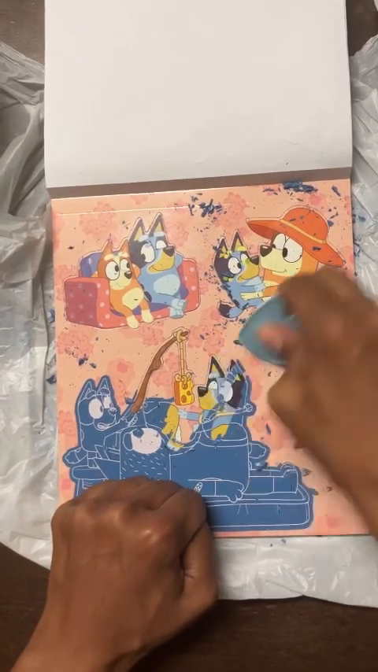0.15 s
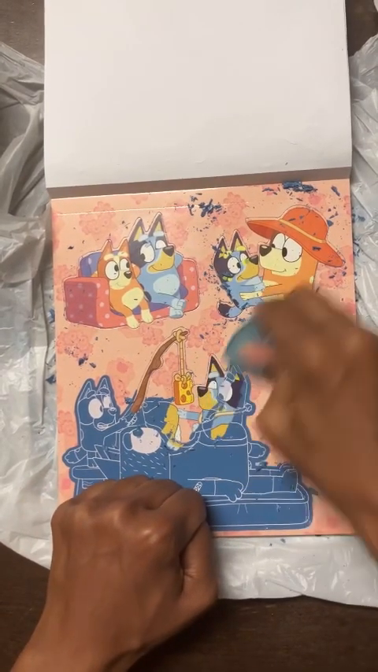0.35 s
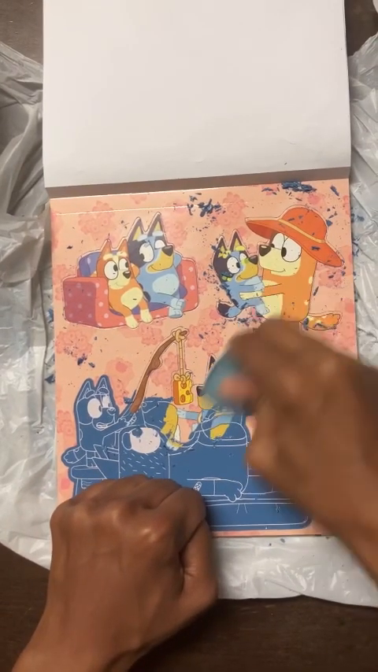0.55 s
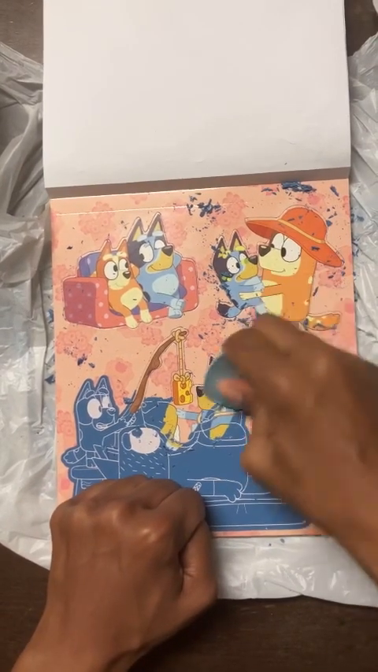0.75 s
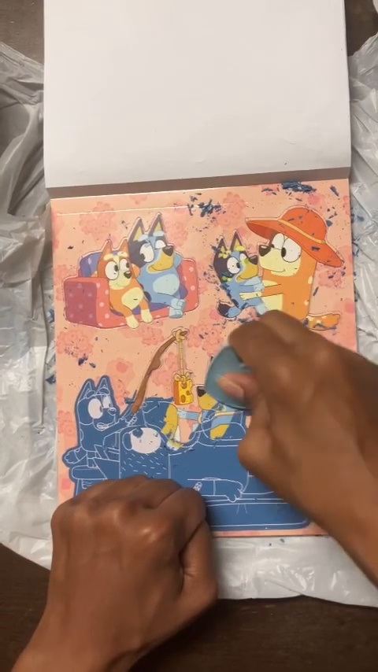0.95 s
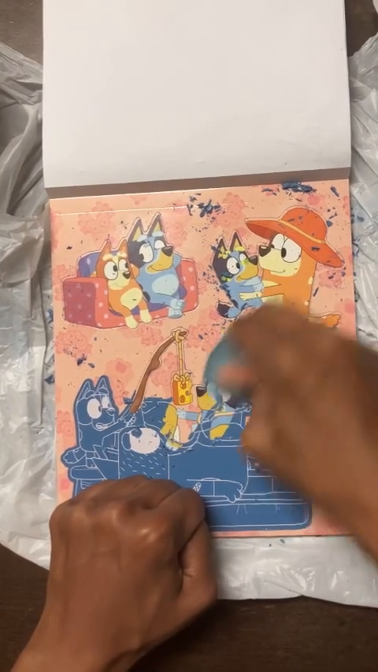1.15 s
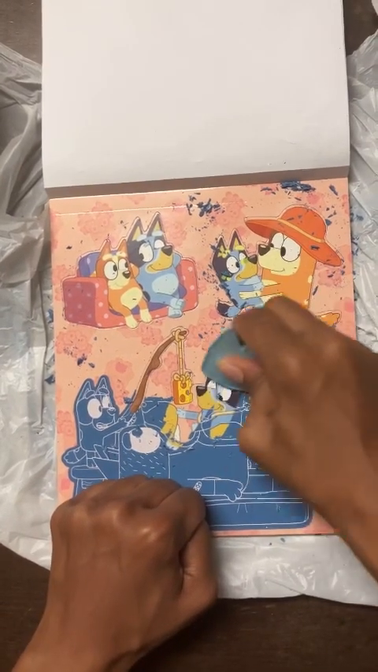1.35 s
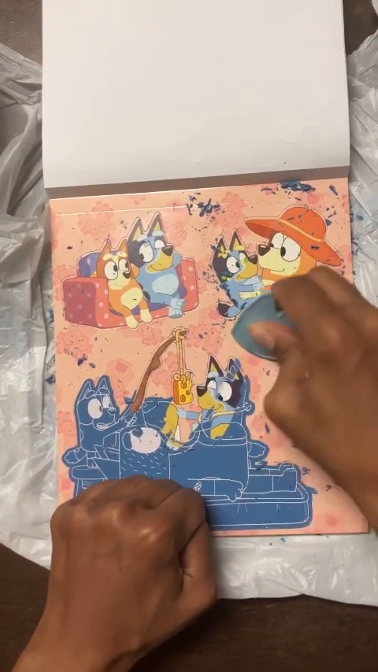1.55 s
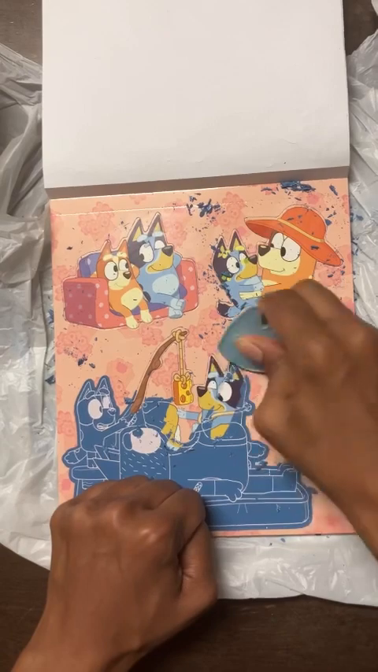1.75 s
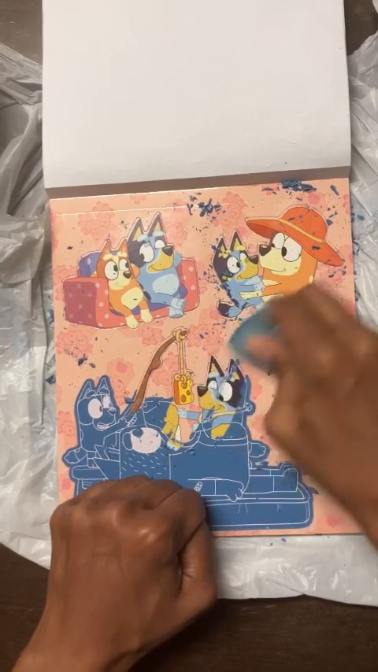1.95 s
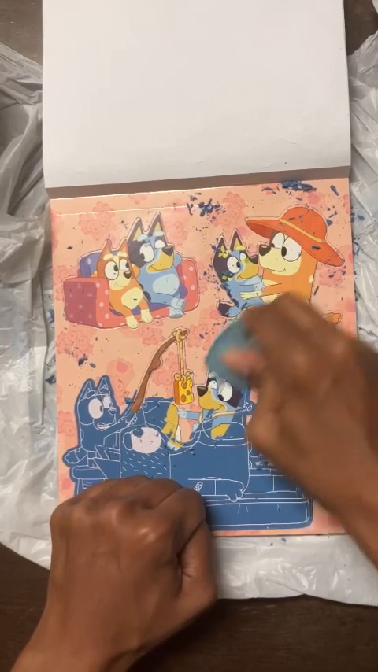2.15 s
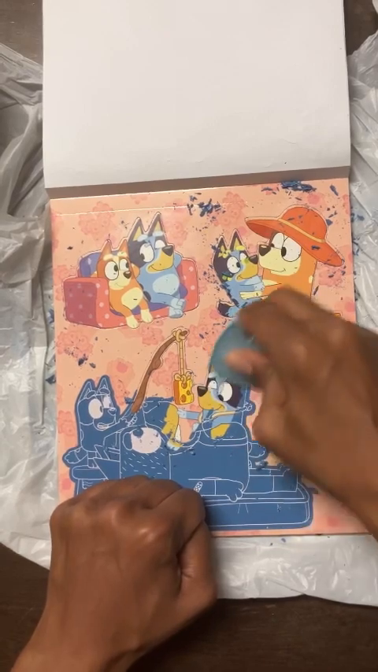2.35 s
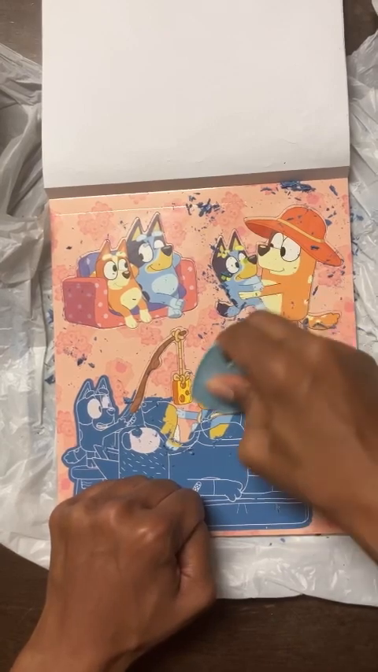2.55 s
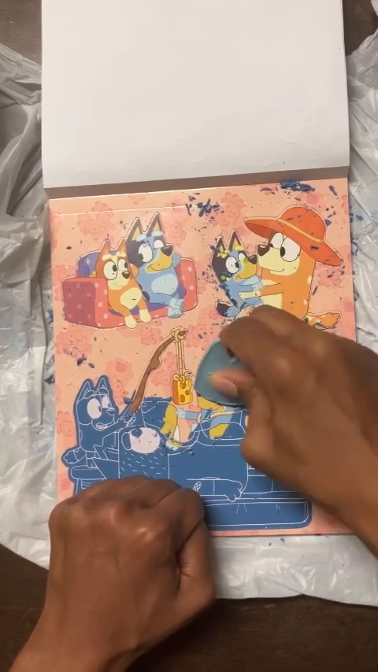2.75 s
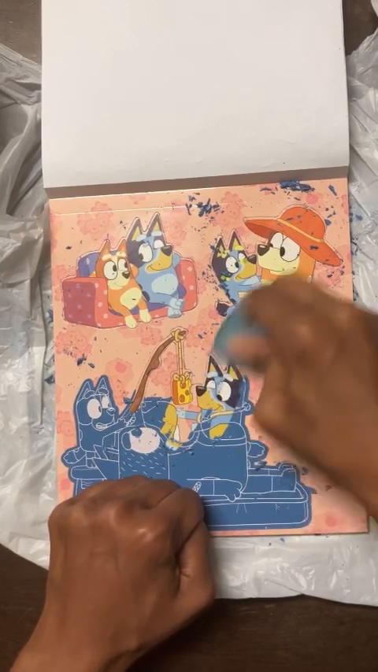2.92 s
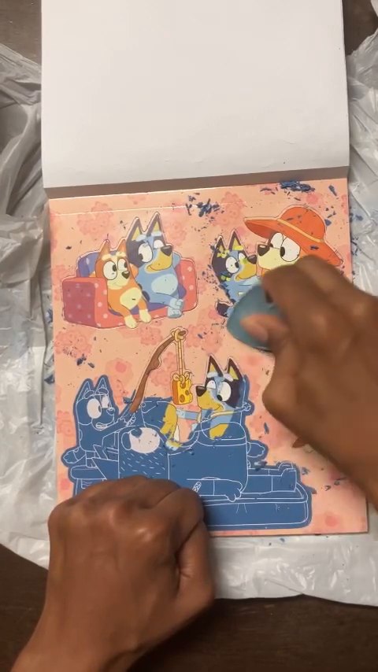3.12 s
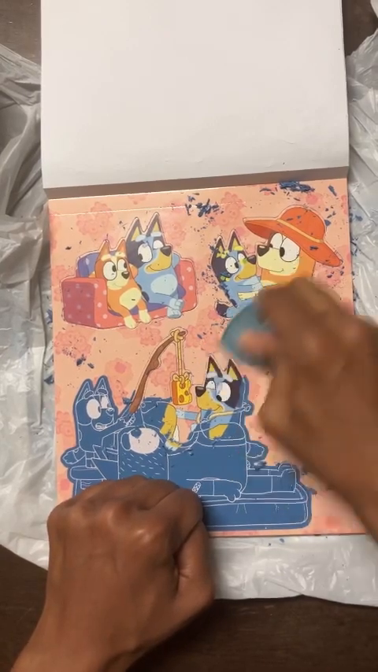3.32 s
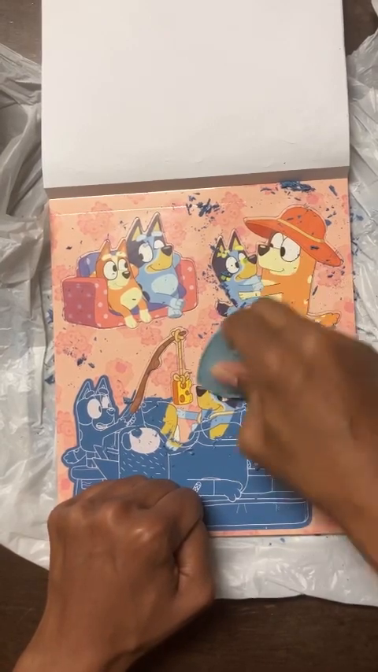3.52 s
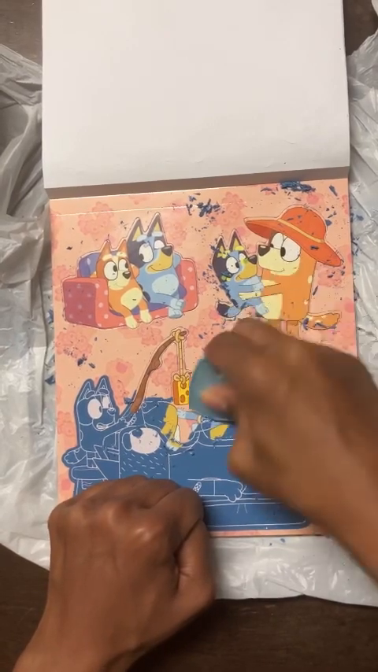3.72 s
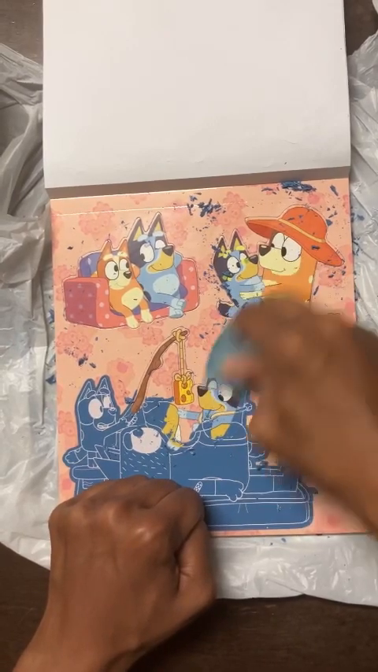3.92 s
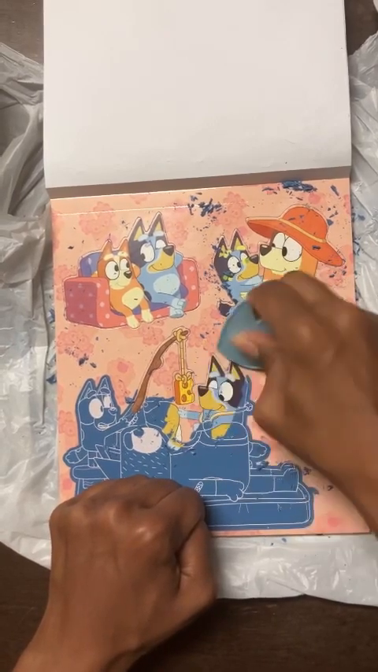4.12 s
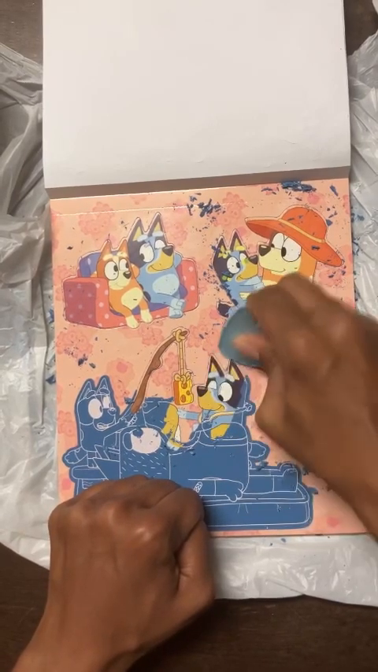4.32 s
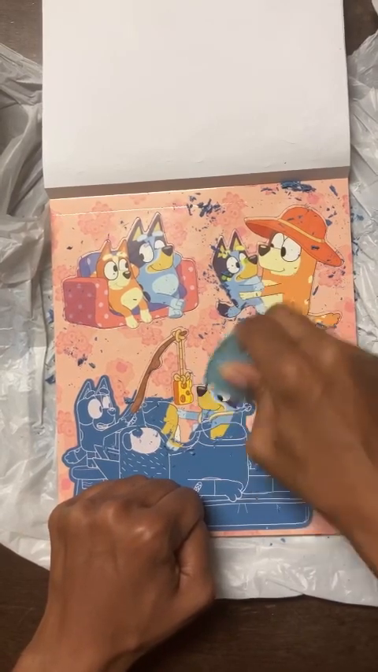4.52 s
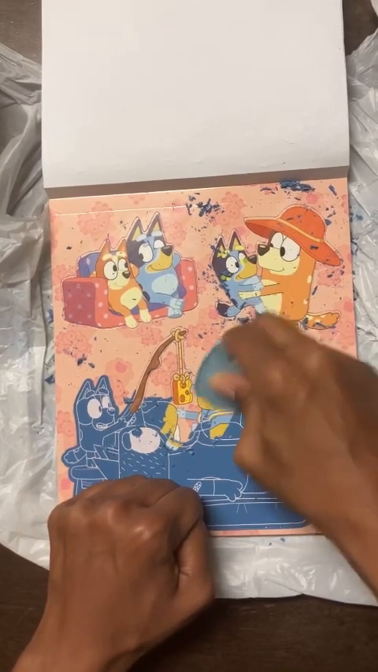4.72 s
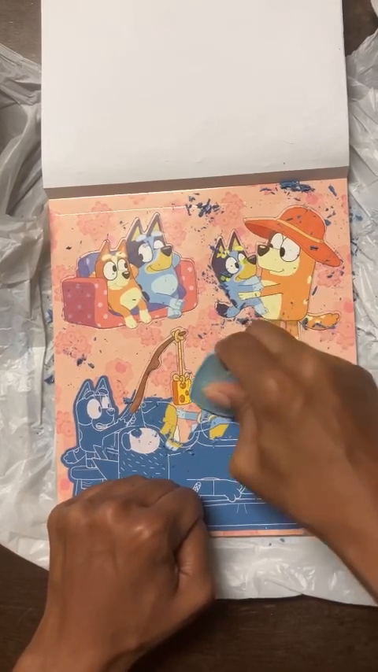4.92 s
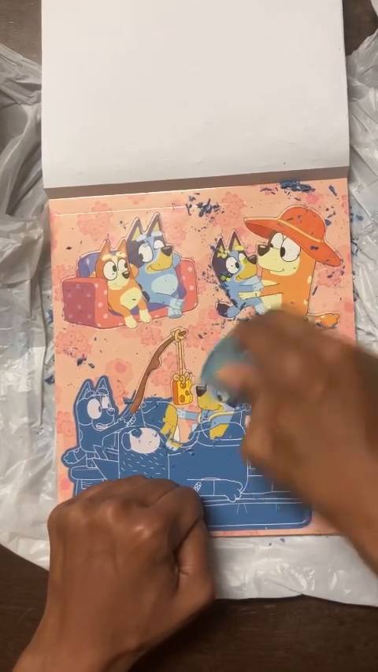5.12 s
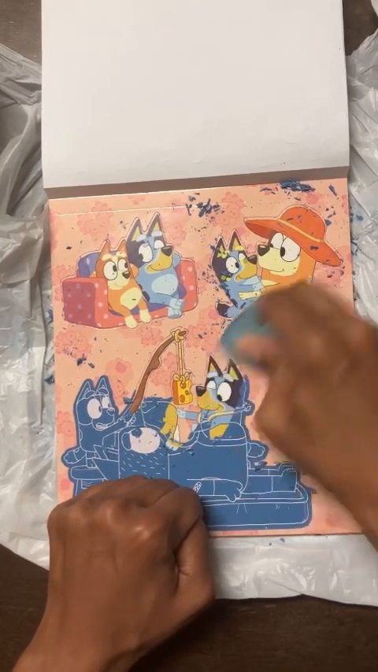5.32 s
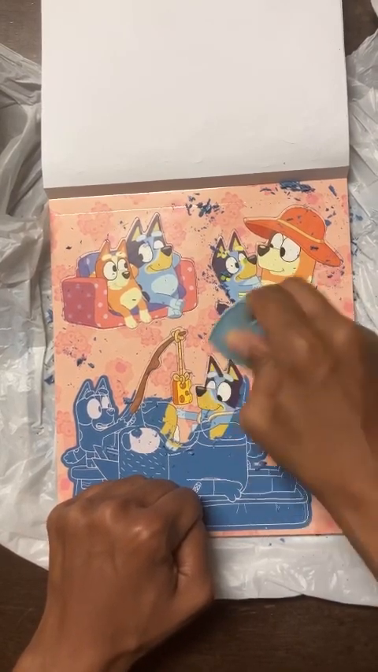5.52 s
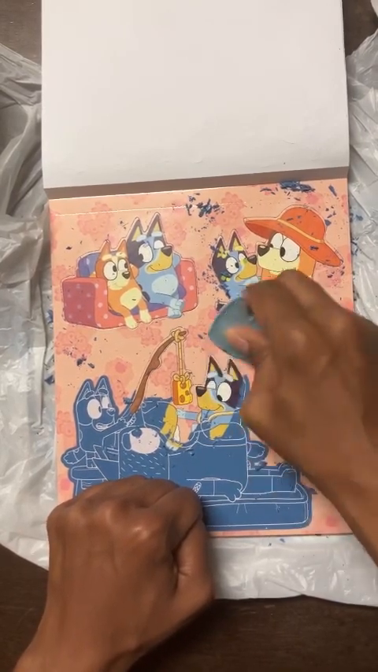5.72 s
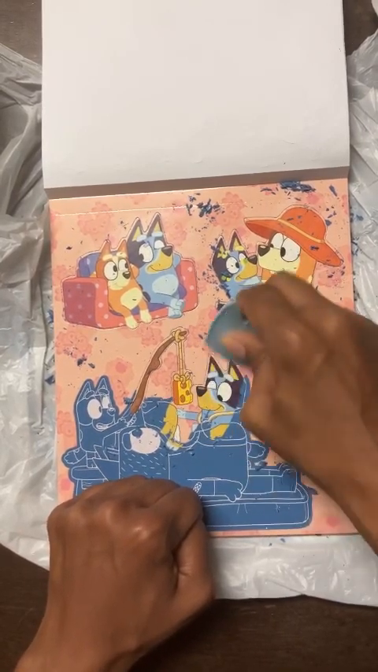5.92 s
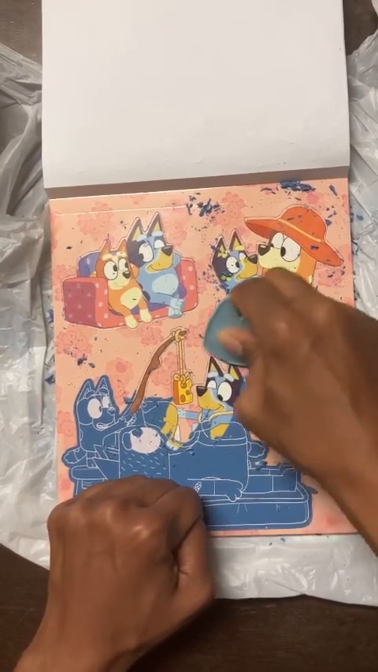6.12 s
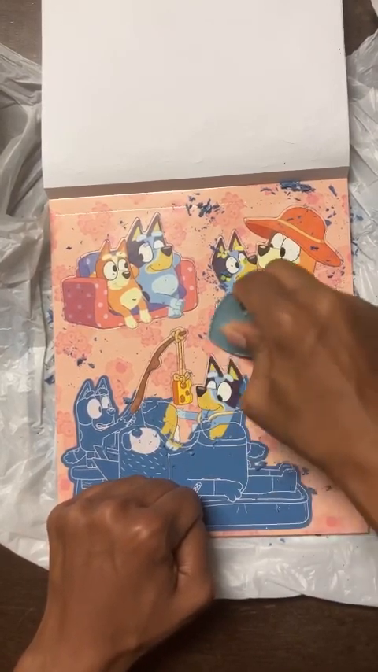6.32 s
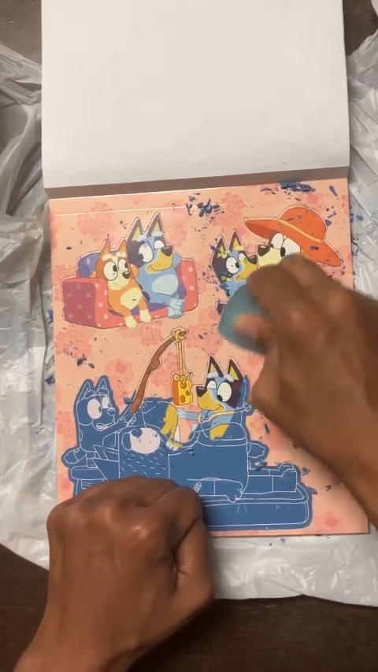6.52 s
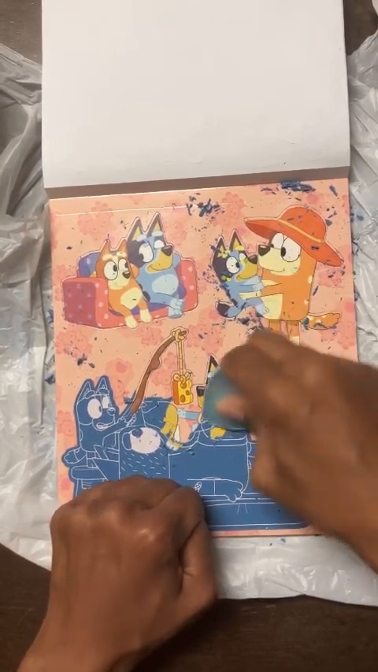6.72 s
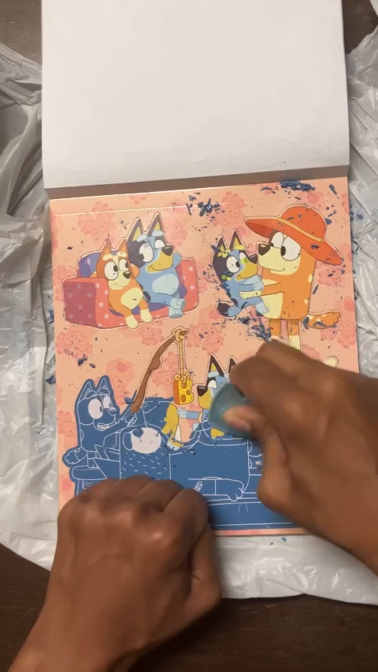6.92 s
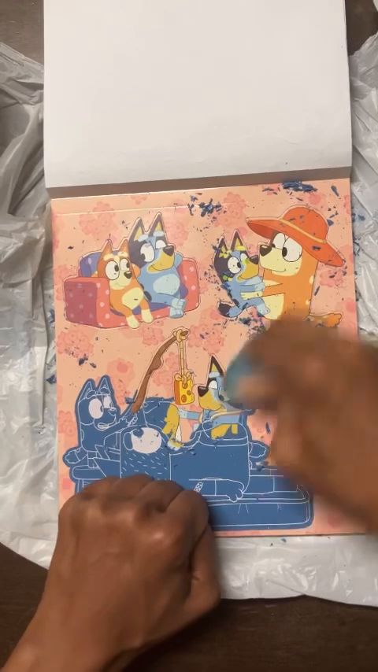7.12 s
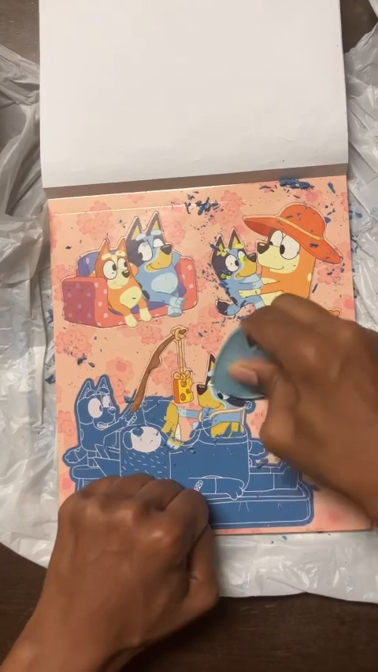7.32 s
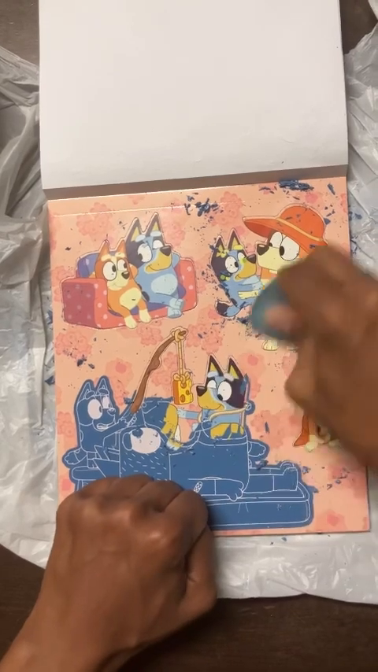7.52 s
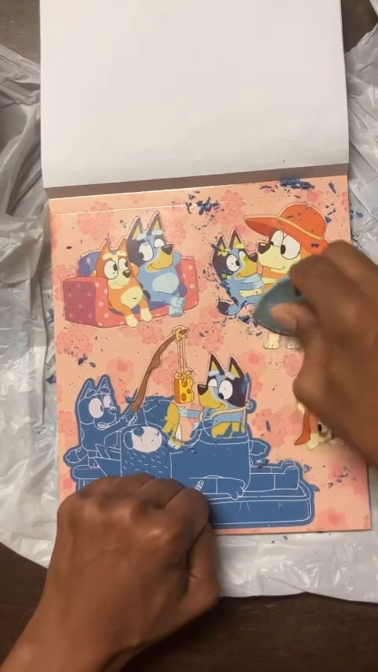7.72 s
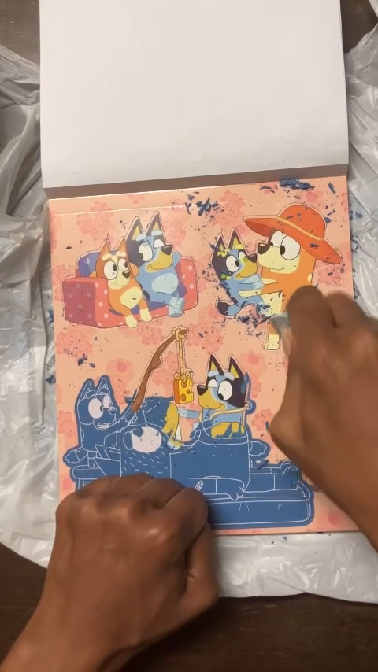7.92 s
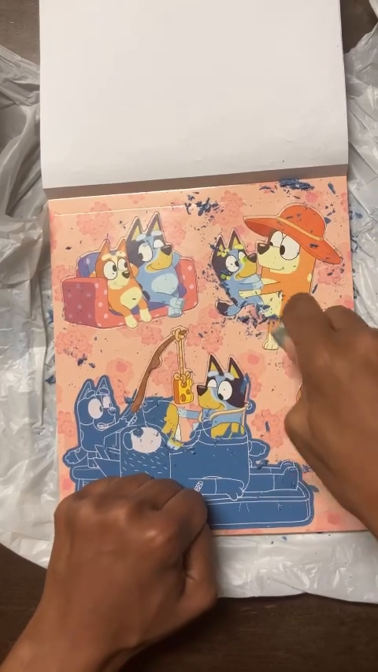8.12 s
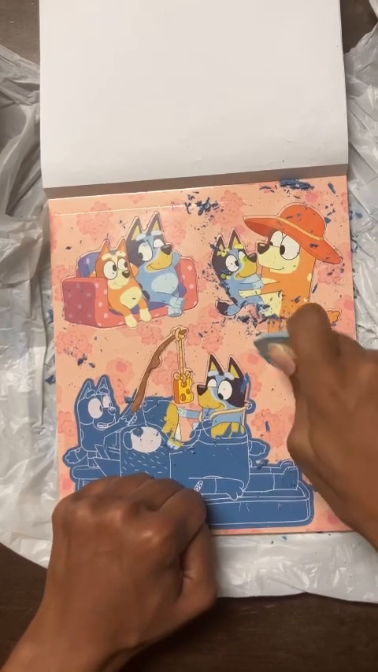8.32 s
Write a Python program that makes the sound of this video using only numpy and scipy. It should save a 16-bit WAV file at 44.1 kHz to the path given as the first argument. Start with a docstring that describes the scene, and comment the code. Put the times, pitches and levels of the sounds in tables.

```python
"""A plastic scraper is rubbed quickly back and forth over a coated page in a pad lying on a table.
Each stroke is a stream of grit that hisses at the edge, rasps in the scraper, rings page and pad and
drums the table. The edge also bites on outward strokes and catches on ridges of coating.
A phone with two microphone ports listens from close above, in a quiet room."""
import sys
import numpy as np
from scipy import signal
from scipy.fft import rfft, irfft, next_fast_len
from scipy.io import wavfile
from scipy.ndimage import uniform_filter1d

SR = 44100
rng = np.random.default_rng(int(sys.argv[2]) if len(sys.argv) > 2 else 0)


def dump(signal):
    """Clip the signal to [-1, 1] and save it as 16-bit WAV at the path in sys.argv[1]."""
    limited = np.clip(np.atleast_2d(signal).T, -1, 1)
    pcm = np.round(limited * 32767).astype(np.int16)
    wavfile.write(sys.argv[1], SR, pcm)


N = 373086
TIME_S = np.arange(N) / SR
FFT_SIZE = next_fast_len(N + SR)
BIN_HZ = np.arange(FFT_SIZE // 2 + 1) * SR / FFT_SIZE


def undb(db):
    """dB to gain."""
    return 10 ** (np.asarray(db) / 20)


def through(x, response):
    """Filter by a frequency response."""
    return irfft(rfft(x, FFT_SIZE) * response, FFT_SIZE)[..., :N]


def unit_rms(x):
    """Scale a signal or response to rms 1."""
    return x / np.sqrt(np.mean(np.abs(x) ** 2))


def colour(points):
    """Response from (f/Hz, level/dB) points joined on a log-frequency axis."""
    hz, db = np.transpose(points)
    return undb(np.interp(np.log(BIN_HZ + 1), np.log(hz), db))


def wander(rate_hz):
    """Random values, held and slewed; spread near 1."""
    hold = int(SR / rate_hz)
    return uniform_filter1d(np.repeat(rng.standard_normal(N // hold + 1), hold), hold)[:N]


# left port over right: f/Hz, level/dB
PORT_BALANCE = [(60, 4.0), (110, 2.5), (200, 4.5), (380, 8.0), (700, 1.0), (1290, -0.5), (2380, 0.0),
                (4400, -1.0), (8120, 0.0), (15000, 0.0)]
# lead of the left port: f/Hz, phase/rad
PORT_LEAD = [(0, 0), (600, -1.5), (1120, -1.2), (2070, .3), (2840, -.2), (4480, .8), (5900, 3.2),
             (8600, 6.3), (11800, 9.5), (14000, 12.1), (15800, 12.9)]


def ports(x):
    """Left and right: path and housing shift the phase, and the right port gets less bass."""
    hz, lead_rad = np.transpose(PORT_LEAD)
    right_response = np.exp(-1j * np.interp(BIN_HZ, hz, lead_rad)) / colour(PORT_BALANCE)
    return np.array([x, through(x, right_response)])


# room noise spectrum: f/Hz, relative density/dB
NOISE_SPECTRUM = [(18, -31.5), (30, 6.5), (279, -7), (382, -27.5), (483, -5), (1210, -26.5), (2330, -24.5),
                  (3540, -28), (14200, -31), (15800, -32.5)]


def room_noise(base_db=-74.5):
    """Faint noise of the room, partly shared by the ports."""
    shape = unit_rms(colour(NOISE_SPECTRUM))
    shared = through(rng.standard_normal(N), shape)
    separate = through(rng.standard_normal((2, N)), shape)
    return undb(base_db + wander(36)) * (ports(shared) + 0.84 * separate)


# colour of the room tail: f/Hz, level/dB
TAIL_SPECTRUM = [(150, -2), (600, -5), (3000, 7.5), (12000, -10.5)]


def room_tail(x, t60_s=0.27, gap_s=0.004, send_db=-8):
    """Short diffuse reverberation, unrelated at the two ports."""
    t = TIME_S[:SR // 2]
    tail = rng.standard_normal((2, len(t))) * np.exp(-np.log(1000) * t / t60_s) * (t > gap_s)
    tail /= np.sqrt(np.sum(tail ** 2) / 2)
    return undb(send_db) * through(x, colour(TAIL_SPECTRUM) * rfft(tail, FFT_SIZE))


def ring(force, modes, wander_db):
    """Decaying modes of a body; as the edge moves about, each is driven now more, now less."""
    hz, peak_db, t60_s = np.transpose(modes)
    poles = np.exp((2j * np.pi * hz - np.log(1000) / t60_s) / SR)
    gains = undb(peak_db) / t60_s * (-1) ** np.arange(len(hz))
    gains /= np.sqrt(np.sum(gains ** 2 / (2 - 2 * np.abs(poles) ** 2)))  # noise gain near 1
    out = 0
    for gain, pole in zip(gains, poles):
        drive = force * undb(wander_db * wander(12))
        out = out + gain * signal.lfilter([0, pole.imag], [1, -2 * pole.real, abs(pole) ** 2], drive)
    return out


def grit(scatter_db, judder_db, judder_hz, cap_db=20):
    """Dense uneven grains, capped in size by the coating's thickness; the juddering edge clumps them."""
    size_db = np.minimum(scatter_db * rng.exponential(size=N), cap_db)
    return unit_rms(rng.standard_normal(N) * undb(size_db + judder_db * wander(judder_hz)))


# strokes, out and back in turn: t/s, length/s, hiss level/dB, page level/dB
HAND_STROKES = [(0.0, 0.043, -43.5, -29.5), (0.1, 0.051, -45, -47), (0.203, 0.077, -47, -43.5),
                (0.314, 0.059, -44, -47), (0.425, 0.072, -47.5, -43), (0.537, 0.07, -46, -49),
                (0.671, 0.044, -48.5, -42), (0.766, 0.076, -56, -52), (0.9, 0.068, -60, -38.5),
                (1, 0.073, -51.5, -50), (1.132, .06, -48.5, -33.5), (1.238, .051, -39.5, -37),
                (1.373, 0.03, -52, -36.5), (1.453, 0.076, -50.5, -50), (1.576, 0.064, -52, -39.5),
                (1.684, 0.074, -50.5, -45.5), (1.812, 0.045, -48.5, -43), (1.913, 0.061, -54, -46),
                (2.019, 0.073, -54, -43), (2.131, 0.058, -47, -43.5), (2.268, 0.04, -57.5, -40.5),
                (2.353, 0.065, -54, -55.5), (2.468, 0.064, -51.5, -45.5), (2.565, 0.066, -51.5, -53),
                (2.694, 0.047, -48.5, -38.5), (2.785, 0.068, -54, -53.5), (2.909, 0.063, -55.5, -43),
                (3.007, 0.086, -57, -57), (3.141, 0.084, -56, -46), (3.257, 0.096, -55, -57),
                (3.416, 0.056, -55.5, -46), (3.526, 0.06, -52, -46.5), (3.662, 0.083, -54.5, -43.5),
                (3.769, 0.077, -54.5, -53), (3.896, 0.074, -51, -46), (4.011, .084, -55, -57),
                (4.147, 0.081, -55.5, -47.5), (4.252, 0.084, -56.5, -54), (4.38, 0.058, -53.5, -46.5),
                (4.488, 0.079, -55, -57), (4.628, 0.044, -51.5, -41.5), (4.722, 0.066, -55.5, -56.5),
                (4.852, .06, -56.5, -45.5), (4.957, 0.071, -52, -50.5), (5.081, 0.067, -54, -42.5),
                (5.176, 0.081, -52, -51.5), (5.308, 0.062, -54.5, -42.5), (5.406, 0.078, -55, -54),
                (5.535, 0.038, -49, -42.5), (5.618, 0.059, -51, -54), (5.744, 0.03, -47, -40.5),
                (5.824, 0.056, -54.5, -55), (5.933, 0.045, -53, -45), (6.021, 0.059, -55, -59),
                (6.165, 0.024, -56, -53.5), (6.243, 0.052, -57, -61), (6.349, 0.053, -53.5, -51.5),
                (6.457, .071, -55.5, -57.5), (6.6, .1, -57.5, -54), (6.746, 0.048, -43.5, -42),
                (6.886, 0.052, -45, -34.5), (6.973, 0.07, -48.5, -44), (7.102, 0.073, -49, -37.5),
                (7.224, .08, -45.5, -45), (7.37, 0.036, -51, -47), (7.461, 0.069, -47, -45),
                (7.819, 0.16, -79, -84.5), (8.222, 0.046, -68.5, -91), (8.348, 0.071, -64, -57.5),
                (8.45, .033, -74, -56)]
# response as the hand works over the page: t/s, rasp offset/dB, pad over page/dB, table offset/dB
BODY_RESPONSE = [(0, 22, 2, -31), (.5, 21, -0.5, -14), (.95, 20, -3.5, -15), (1.25, 20.5, 2.5, -20),
                 (1.8, 18, -7, -20.5), (2.3, 25.5, 1.5, -15.5), (2.9, 18, -2, -26), (3.5, 19, -5, -24),
                 (4.2, 26.5, 0.5, -20.5), (4.7, 20.5, 1, -19), (5.3, 16.5, -8, -27.5), (5.6, 11, 1, -19.5),
                 (5.9, 20, 9.5, -20), (6.4, 16, 3, -20), (6.8, 22, 2, -25.5), (7.4, 25.5, 4, -25),
                 (7.9, 29.5, 19, -37.5), (8.3, 22.5, -13, -22)]


def stroke_gains(rise_out_s=0.012, rise_back_s=0.013, fall_s=0.015, ends_db=-7.5,
                 swell_out_db=1.5, swell_back_db=4):
    """Envelopes for edge, scraper, page, pad and table: the hand speeds up, slides and slows to turn."""
    out = np.zeros((5, N))
    times_s, *offsets_db = np.transpose(BODY_RESPONSE)
    swell_share = [0.51, 0.21, 1, 0.7, 0.4]  # most in the page, which takes the hand's pressure
    for k, (start_s, length_s, hiss_db, page_db) in enumerate(HAND_STROKES):
        rise_s, swell_db = (rise_back_s, swell_back_db) if k % 2 else (rise_out_s, swell_out_db)
        span = slice(max(int((start_s - 0.1) * SR), 0), int((start_s + length_s + 0.15) * SR))
        t = TIME_S[span] - start_s
        fade_in = np.exp(np.minimum(-t / rise_s, 5))
        fade_out = np.exp(np.minimum((t - length_s) / fall_s, 5))
        ramp = 2 * np.clip(t / length_s, 0, 1) - 1
        shape_db = ends_db * (fade_in + fade_out) + np.outer(swell_share, swell_db * ramp)
        rasp_offset, pad_offset, table_offset = (np.interp(start_s, times_s, db) for db in offsets_db)
        rasp_db = 0.91 * hiss_db + 0.63 * page_db + rasp_offset
        pad_db = page_db + pad_offset
        table_db = 0.61 * pad_db + table_offset
        levels_db = np.array([hiss_db, rasp_db, page_db, pad_db, table_db])
        out[:, span] += undb(shape_db + levels_db[:, None])
    return out


def bites(page_offset_db=-4.5, low_offset_db=-2.5, hiss_db=-29):
    """The edge bites as each outward stroke starts; rows as in RIDGE_CATCHES."""
    times_s, _, pad_db, _ = np.transpose(BODY_RESPONSE)
    return [(start_s, page_db + page_offset_db, low_offset_db + np.interp(start_s, times_s, pad_db), hiss_db)
            for start_s, _, _, page_db in HAND_STROKES[::2]]


# catches on ridges: t/s, base level/dB, pad and table offset/dB, hiss offset/dB
RIDGE_CATCHES = [(.028, -37, -21.5, -18.5), (.137, -43, -37, 9), (.225, -34, -20.5, -2),
                 (.269, -35.5, -29, -13.5), (.321, -45.5, -2.5, 12.5), (.443, -36.5, -20, -3),
                 (.675, -33, -7.5, -3), (.704, -25.5, -2, -31), (.719, -27.5, -17, -6),
                 (.9, -36.5, -3, -11.5), (.926, -33, -4, -8.5), (.939, -26, -11.5, -10.5),
                 (1.044, -36.5, -31, -3), (1.137, -32.5, -15, -14), (1.175, -30, -26, -24),
                 (1.243, -36, -24, 1.5), (1.595, -26, -8.5, -11), (1.721, -33, -28, 0),
                 (1.816, -29, -5, -23.5), (1.824, -28.5, -2.5, -12), (1.836, -21, -9, -20.5),
                 (2.042, -35, -36.5, -19), (2.164, -36.5, -4.5, 4), (2.267, -32.5, -12, -14.5),
                 (2.384, -37.5, -31, -10), (2.485, -25.5, -12.5, -18), (2.621, -38, -9, -6),
                 (2.695, -29, -11, -22), (3.456, -25.5, -3.5, -12), (3.697, -33.5, -18, -12),
                 (3.716, -28.5, -13, -10), (3.962, -45, 3, -12), (4.186, -40, -7, -16),
                 (4.643, -32, -1, -13), (5.132, -41.5, -9, -9), (5.337, -36, -36, -24),
                 (5.765, -41, 3.5, -5), (5.94, -46, 1, -20), (6.165, -59, 5, -10), (6.346, -49, 3.5, -27),
                 (6.385, -52, 5, -8), (6.751, -43.5, -9, -3), (6.909, -23, -23.5, -27),
                 (7.47, -43.5, -5, 11.5), (7.485, -41, -20, 5), (8.243, -54, -32, -12)]


def catches(push_s=0.00014, rattle_s=0.0015, spray_s=0.0057, grow_s=0.00125):
    """The edge jumps: grit sprays edge and scraper; a rattle grows to a push on page, pad and table."""
    out = np.zeros((5, N))
    t = TIME_S[:SR // 25]
    grow = 1 - np.exp(-t / grow_s)
    push_age = np.maximum(t - grow_s, 0) / push_s
    pulse = push_age * np.exp(1 - push_age)
    for start_s, base_db, low_db, hiss_db in bites() + list(RIDGE_CATCHES):
        grains = rng.standard_normal(len(t)) * grow
        push = pulse + 0.14 * grains * np.exp(-t / rattle_s)
        spray = grains * np.exp(-t / spray_s)
        offsets_db = np.array([hiss_db + 0.5, 0.62 * hiss_db - 0.5, 2.5, low_db + 3.5, low_db + 2])
        forces = undb(base_db + offsets_db)[:, None] * [spray, spray, push, push, push]
        i = int(start_s * SR)
        out[:, i:i + len(t)] += forces[:, :N - i]
    return out


# modes of each body: f/Hz, relative peak level/dB, t60/s
TABLE_MODES = [(35.5, -6, 0.22), (68.1, -7, 0.25), (104, -6.5, 0.081), (119, -6.5, 0.081),
               (165.5, -5.5, 0.11)]
PAD_MODES = [(211.3, -4.5, 0.19), (283.2, 2, 0.084), (328.3, -6, 0.081), (374.7, -5.5, 0.075),
             (464.3, -4, 0.13), (585, -15.5, 0.041), (260, -11.5, 0.018)]
PAGE_MODES = [(709, -5, 0.042), (734, -8, 0.038), (813, -6.5, 0.046), (896, 2, 0.085), (1096, -18, 0.14),
              (1189, -3, 0.035), (1209, -6.5, 0.018), (1340, -3, 0.068), (1433, -8.5, 0.026),
              (1560, -4.5, 0.048), (1665, -8, 0.049), (1808, -13, 0.055), (1120, -2, 0.015)]
SCRAPER_MODES = [(2000, 1.5, 0.0092), (2490, -2.5, 0.024), (2783, 2, 0.012), (3088, -3.5, 0.035),
                 (3600, -2, 0.0095), (3910, -9.5, 0.017), (4180, -15.5, 0.013), (2680, -6.5, 0.00087),
                 (4710, -5, .004)]
# hiss of the edge: f/Hz, relative density/dB
EDGE_SPECTRUM = [(4000, -14), (5200, -11.5), (6200, -7.5), (6900, -10.5), (7500, -4), (8500, -7.5),
                 (10000, -5.5), (11500, -17.5), (13500, -10.5), (15000, -15.5), (16000, -12.5)]


def scraping():
    """Grit and catches drive the edge, the scraper, the page, the pad and the table."""
    dust = grit(scatter_db=2.8, judder_db=2.43, judder_hz=150)
    flakes = grit(scatter_db=5.5, judder_db=4.3, judder_hz=120)
    lumps = grit(scatter_db=3.44, judder_db=3.16, judder_hz=90)
    forces = stroke_gains() * np.array([dust, flakes, lumps, lumps, lumps]) + catches()
    on_edge, on_scraper, on_page, on_pad, on_table = forces
    on_scraper = on_scraper + undb(-15) * on_page  # what shakes the page jolts the scraper too
    hiss = through(on_edge * undb(2.06 * wander(30)), unit_rms(colour(EDGE_SPECTRUM)))
    rasp = ring(on_scraper, SCRAPER_MODES, wander_db=2.5)
    page = ring(on_page, PAGE_MODES, wander_db=2.5)
    pad = ring(on_pad, PAD_MODES, wander_db=3)
    table = ring(on_table, TABLE_MODES, wander_db=-0.5)
    return hiss + rasp + page + pad + table


def scene():
    """Scraping at both ports, its room tail and the room noise."""
    scrape = scraping()
    return ports(scrape) + room_tail(scrape) + room_noise()


def record(dry, bottom_hz=30, top_hz=15900):
    """The phone cuts the lowest bass and the top."""
    highpass = signal.butter(2, bottom_hz, "high", fs=SR, output="sos")
    lowpass = signal.ellip(10, 0.2, 80, top_hz, fs=SR, output="sos")
    return signal.sosfilt(lowpass, signal.sosfilt(highpass, dry))


dry = scene()
out = record(dry)
dump(out)
```